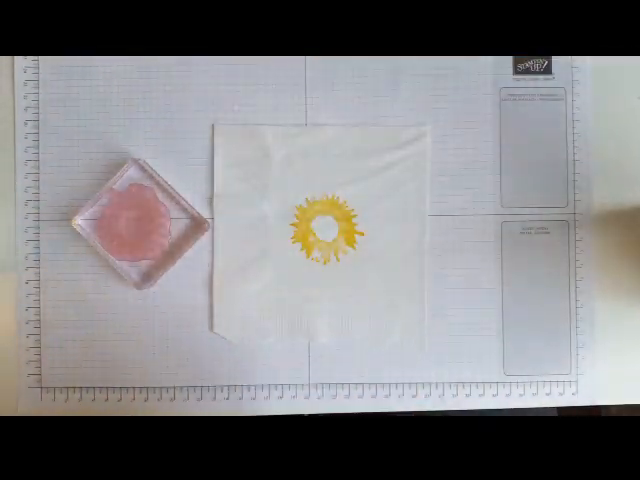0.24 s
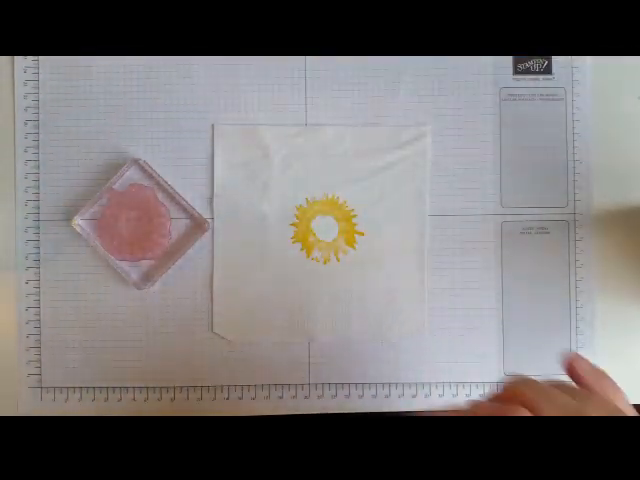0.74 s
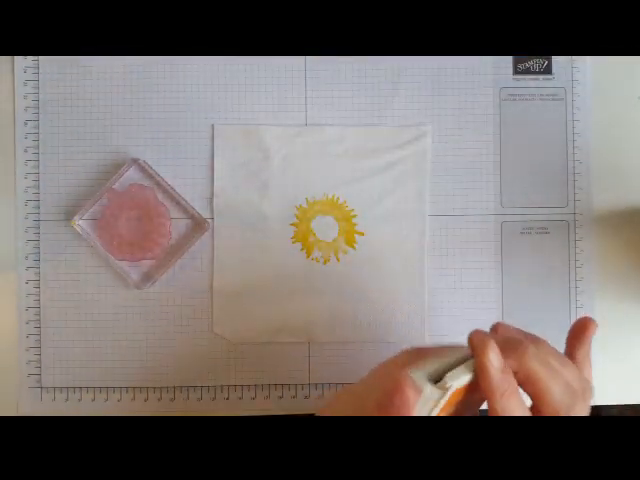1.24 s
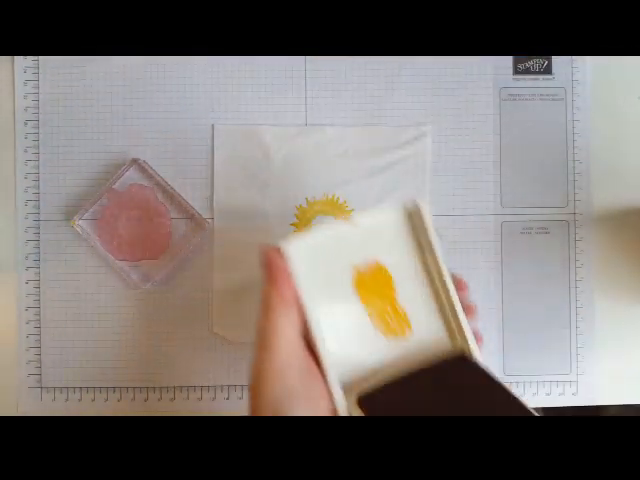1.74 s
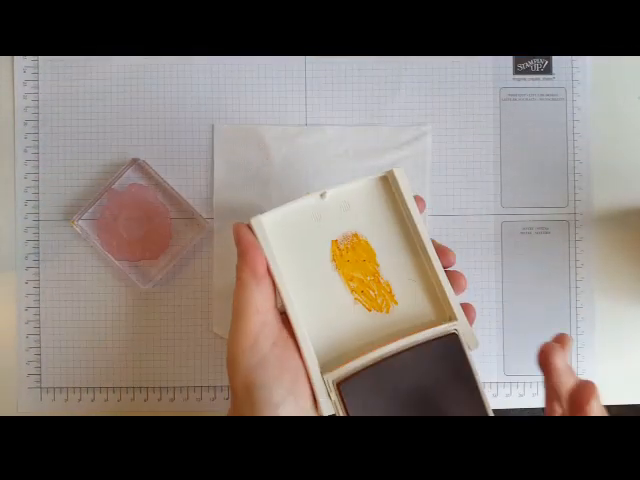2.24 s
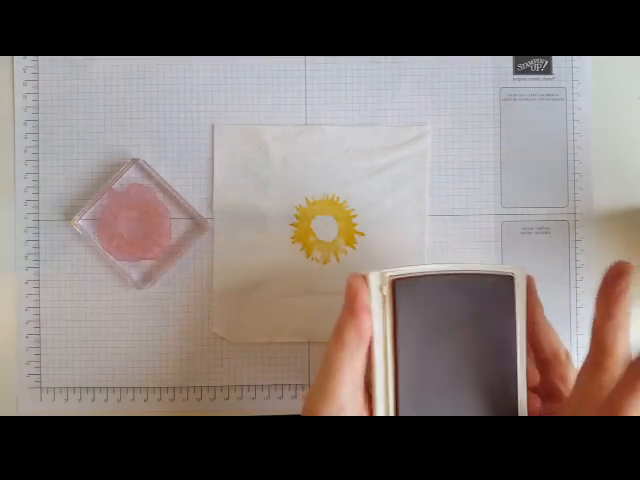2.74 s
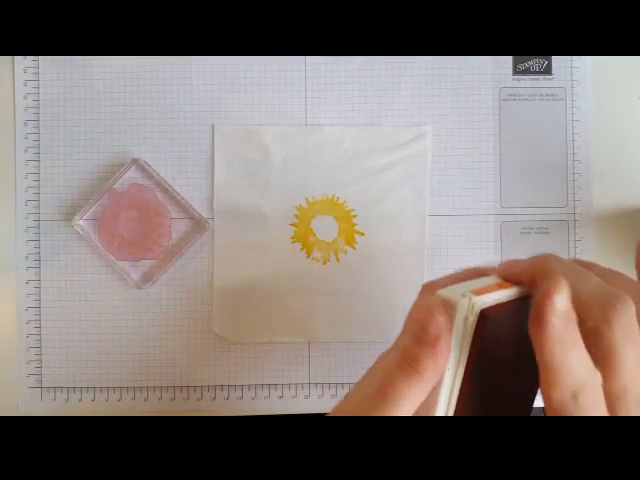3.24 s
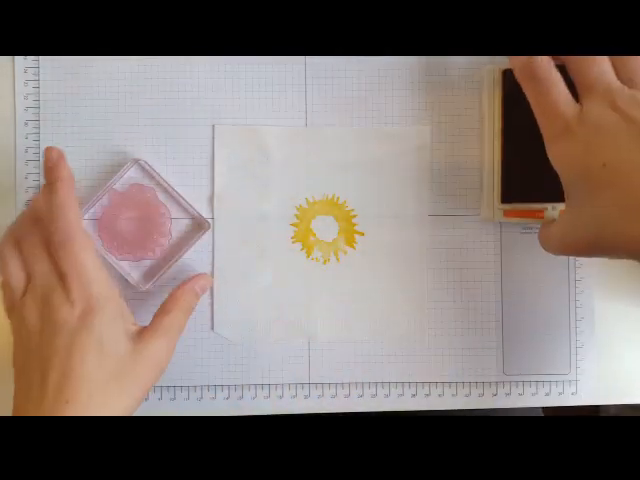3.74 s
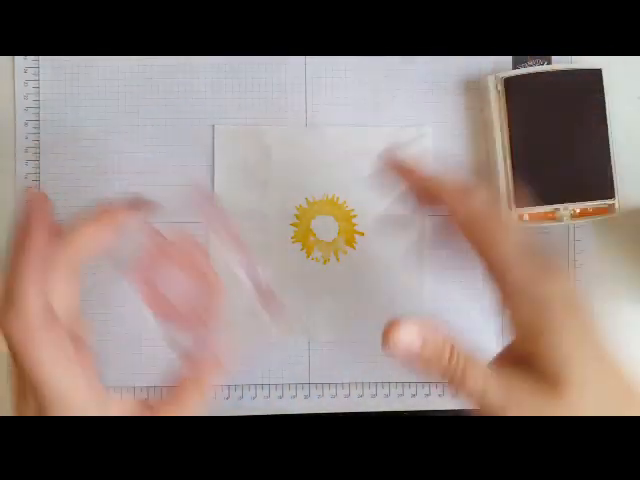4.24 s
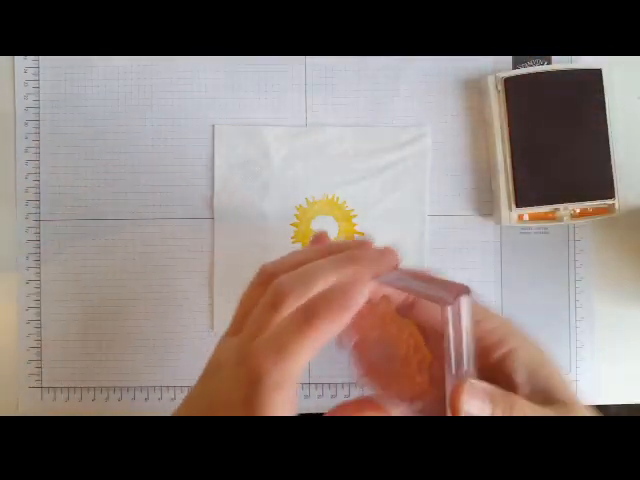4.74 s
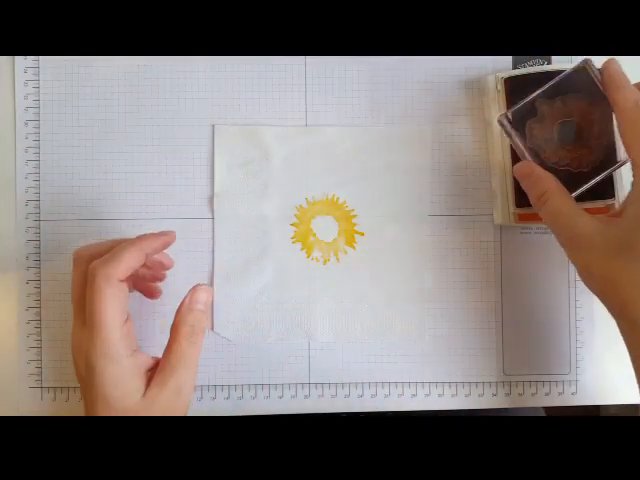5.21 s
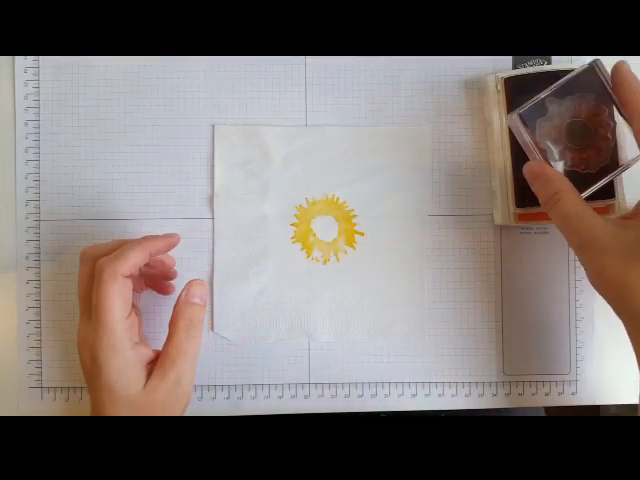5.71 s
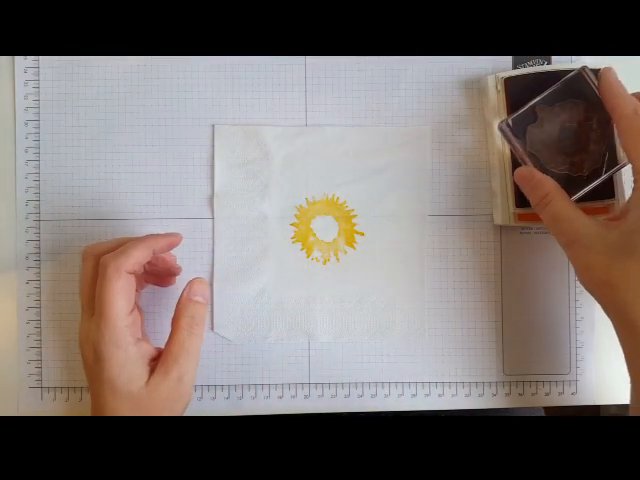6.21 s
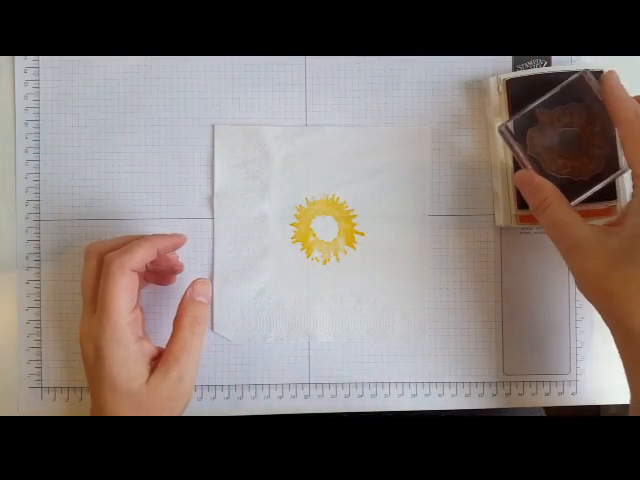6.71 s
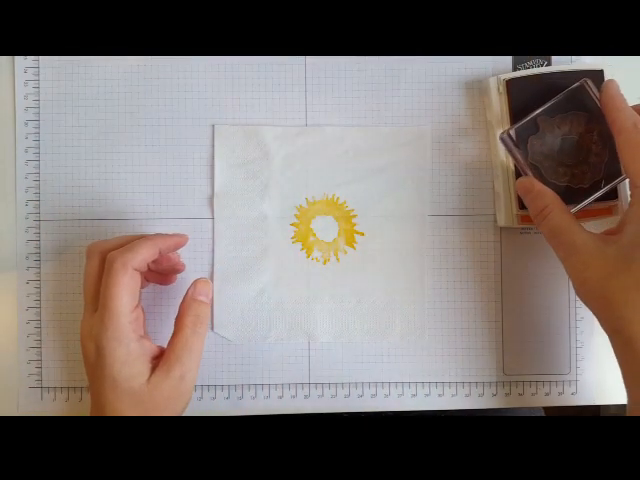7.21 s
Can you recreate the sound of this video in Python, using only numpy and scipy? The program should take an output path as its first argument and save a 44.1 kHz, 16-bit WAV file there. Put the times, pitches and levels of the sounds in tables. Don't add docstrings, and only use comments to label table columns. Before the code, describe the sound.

Close plastic clicks and clacks, a short scraping slide and latch snap, two firm knocks on the desk, then quiet padded taps with faint sticky peels.

```python
import sys
import numpy as np
from scipy import signal
from scipy.fft import rfft, irfft
from scipy.io import wavfile
from scipy.ndimage import uniform_filter1d

SR = 44100
rng = np.random.default_rng(int(sys.argv[2]) if len(sys.argv) > 2 else 0)


def master_out(mix):
    frames = np.transpose(np.atleast_2d(mix))
    ceiling = np.clip(frames, -1, 1)
    pcm = np.round(ceiling * 32767).astype(np.int16)
    wavfile.write(sys.argv[1], SR, pcm)


def to_linear_factor(level_db):
    exponent = np.asarray(level_db, float) / 20
    return 10 ** exponent


N = 329338
T = np.arange(N) / SR

# start in seconds, middle modes in dB, low modes in dB re middle,
# brightness in dB re middle, contact time in ms.
OPENING_BLOWS = [(0.872, -42.5, 3.5, -7.5, 7.5), (0.894, -40, 0.5, 5.5, 3.54),
                 (0.986, -51, 11.5, -6.5, 3.9), (1.003, -42.5, -0.5, -5.5, 2.2),
                 (1.063, -36.5, 5.5, 6.5, 4.45), (1.119, -32.5, -11, -13, 5.2),
                 (1.164, -49, 4.5, -28.5, 2.1), (1.188, -37.5, -10.5, -20, 1.9), (1.323, -54, -5, -8.5, 4),
                 (1.378, -25.5, -0.5, 4.5, 4), (1.386, -49, -3, -0.5, 4.3), (1.479, -47.5, -11, -15, 5.3),
                 (1.557, -40, -8, -9, 11), (1.575, -30.5, -7.5, -10, 2.45), (1.599, -35, -7.5, -9, 2.1),
                 (1.71, -49, -22, -15, 3.8)]
FLIP_BLOWS = [
    (1.7595, -35.5, 11.5, -2, 2.8),
    (1.8355, -25, 0, -10.5, 3),
    (1.867, -32, 8, -7.5, 2.9),
    (1.8795, -18, -3, -5, 3),
    (1.89, -33.5, 0, -6, 4),
    (1.921, -27.5, 9.5, -0.5, 5.1),
    (1.960, -34.5, -4.5, 8, 3.6),
    (1.9685, -26.5, 7, 2, 3.6),
    (2.007, -33.5, -3, -6.5, 2.8),
    (2.105, -52, -3.5, -5, 2),
]
LATCH_BLOWS = [(2.331, -53.5, -8.5, -21.5, 5.1), (2.344, -51.5, -8.5, -17, 4.9), (2.406, -44, 0, 0, 2.5),
               (2.4525, -37, 3, 5, 2.1), (2.4845, -34, 3.5, 10, 1.7), (2.492, -40, 4, 4.5, 1.8),
               (2.519, -45, -9, 1, 1.5), (2.579, -41, -8, 9, 2.7), (2.634, -18, -7.5, 5, 3.2),
               (2.644, -31.5, 1.5, 2.5, 2.5), (2.7665, -26.5, 1, -6, 2.1), (2.7695, -16.5, 0.5, 3.5, 5.2),
               (3.031, -48.5, -30.5, -8.5, 3.2), (3.054, -54, -26, -15, 1.7)]
NAIL_TICKS = [
    (2.978, -71.5, -6.5, 9.5, 1.7),
    (2.9995, -55, -16, 4, 1.25),
]
SET_DOWN_BLOWS = [
    (3.8635, -19.5, -4, -6, 1.6),
    (3.874, -23, -11, -18.5, 0.54),
    (3.970, -17, -3, 3.5, 3),
    (3.979, -20, -4.5, 2.5, 1.4),
    (4.509, -61, -23, -17, 3.9),
]
TAP_BLOWS = [
    (5.411, -56.5, 34.8, -6.5, 6.1),
    (5.975, -43, 23.75, -24, 9.6),
    (6.35, -62.5, 30.8, -14, 4.5),
    (6.514, -45.5, 29.3, -6.5, 5.1),
    (6.918, -51.5, 37.6, 6.5, 7),
    (7.176, -43.5, 26.5, -5.5, 8.4),
]
LIFT_TICKS = [
    (5.694, -55, 5, -31, 6.3),
    (6.179, -61, -15, -16, 2.4),
    (6.773, -64.5, 34.5, -10, 12.5),
    (7.078, -49, 6.5, -30, 16.5),
    (7.108, -72, -13.5, -24.5, 1.7),
    (7.307, -56, -1, -33, 4.4),
]
DESK_BLOWS = [
    (0.306, -56, -3, -8, 33),
    (0.3325, -27.5, 1, 1, 5.1),
    (0.340, -35, 1, -7, 2.5),
    (0.347, -28, 7.5, -4, 4.7),
    (0.362, -36.5, 1, -9, 12),
]

# frequency in Hz, width in Hz, peak height in dB.
SHUT_CASE_MODES = [(386, 47, 7.5), (500, 123, 3.5), (774, 37, 2), (1200, 300, -1), (1764, 100, -28),
                   (2380, 410, -18.5), (2820, 2600, 0.5)]
LID_POP_MODES = [(374, 41, 0), (1025, 48, -5), (1180, 38, -6.5), (1690, 25, -6), (2412, 36, -6.5),
                 (2980, 76, -9.5), (3590, 30, -7), (3930, 19, -17), (4870, 25, -19)]
LOOSE_LID_MODES = [(496.7, 22, -5.5), (770, 32, -12.5), (1150, 130, -1.5), (1580, 17, -16), (1827, 26, -12),
                   (2170, 69, -4.5), (2690, 32, -9.5), (3340, 27, -29), (3770, 45, -26)]
RAIL_MODES = [(290, 65, -5), (379, 26, 6), (510, 63, 9), (740, 100, -11), (1080, 60, 4.5), (1970, 110, 5.5),
              (2270, 390, 0.5), (2500, 57, 1), (2900, 360, -8.5), (3642, 210, -2), (8560, 860, 2.5)]
LID_STOP_MODES = [(511, 83, -7), (1050, 200, 2), (1790, 270, -1.5), (2680, 170, -2.5), (3454, 89, -12.5),
                  (3960, 230, -14.5), (4540, 100, -12)]
LATCH_MODES = [(377, 30, -2), (641, 60, -9.5), (1054, 83, 0), (1200, 100, -5.5), (1640, 60, -9),
               (2024, 79, -2), (2190, 65, -4), (2480, 51, -4), (3400, 60, -14), (3630, 60, -2),
               (4970, 80, -21)]
CASE_EDGE_MODES = [(280, 39, 2), (376, 40, -13.5), (660, 60, -1.5), (757, 32, 6), (1150, 75, -6),
                   (1580, 130, 2.5), (1950, 100, -10.5), (2300, 200, -8.5), (2650, 150, -17.5)]
CASE_ON_DESK_MODES = [(137, 10, 1), (289, 6.5, 8), (388, 34, 3), (495, 21, 12), (740, 34, 7),
                      (1140, 120, 3), (1646, 104, -4.5), (2125, 130, -1.5), (2780, 170, -4),
                      (3880, 500, -5), (5000, 530, -8)]
PAD_MODES = [(44.7, 5.9, 1), (73.8, 6.6, 1.5), (131, 4.6, 5), (210.4, 1.8, -18), (293.7, 22.2, 1.5),
             (328, 34, -27), (408, 6.8, -5.5), (785, 54, -1.5), (1100, 87, -0.5), (1550, 90, 1.5),
             (1860, 430, -2)]
DESK_MODES = [(193, 25, -7), (280, 15.5, -3), (530, 68, -2), (761, 63, -4), (1184, 55, -7.5),
              (1530, 40, -12), (1890, 68, -8), (2380, 120, -24), (2800, 40, -26), (3350, 50, -25),
              (4830, 200, -7)]

# frequency in Hz, width in Hz, peak height in dB.
SLIDE_MODES = [(440, 53, -5), (600, 49, -9), (1140, 88, 3), (1480, 260, -5), (1890, 94, 1), (2100, 180, -1),
               (2250, 160, 3), (2560, 220, -4.5), (3000, 200, -6), (3550, 350, -10.5)]
PEEL_MODES = [(504, 32, 11), (750, 160, -5), (1080, 140, -27), (1520, 220, -6.5), (2124, 170, -4),
              (2600, 200, -9.5), (4300, 2300, -23)]
# peak in seconds, level in dB, rise in seconds, fall in seconds (30 dB each),
# hiss in dB re level.
SLIDE_STROKES = [
    (1.13, -69, .008, 0.28, 4),
    (1.26, -56.5, 0.052, 0.08, -3),
    (1.558, -45.5, 0.005, 0.061, -11),
    (1.775, -55.5, 0.23, .05, -12),
    (2.435, -53, 0.2, .2, -8.5),
    (2.51, -52.5, .05, .2, -9.5),
    (2.55, -51, 0.14, .16, -7.5),
    (2.61, -59.5, 0.091, .06, -17),
    (3.378, -53, 0.035, 0.054, -3),
]
PEEL_STROKES = [
    (5.715, -59, 0.043, 0.086, -27),
    (6.32, -64, 0.08, 0.044, -22),
    (6.78, -51, 0.044, 0.051, -20),
    (7.1, -67, 0.1, 0.037, -22.5),
    (7.345, -65, 0.14, 0.087, -12.5),
]
# peak in seconds, level in dB, rise in seconds, fall in seconds,
# favoured frequency in Hz.
SLIDE_CATCHES = [(1.255, -51.5, 0.026, 0.033, 2173), (1.263, -48, 0.047, 0.047, 600),
                 (1.612, -50, 0.034, 0.016, 2400), (1.62, -58.5, .05, 0.11, 1220),
                 (1.715, -55, .06, 0.052, 1200), (2.41, -52, 0.0097, 0.031, 480),
                 (2.415, -49, 0.027, 0.17, 1150), (2.435, -49.5, 0.033, 0.049, 3000),
                 (2.46, -40.5, .02, 0.0088, 2500), (2.494, -32, 0.022, 0.0099, 2400),
                 (2.5, -46, 0.028, 0.085, 450), (2.525, -44, 0.026, 0.072, 2500),
                 (2.536, -49.5, .05, 0.028, 1150), (2.57, -49, 0.054, 0.057, 1400),
                 (2.582, -45, 0.028, 0.14, 3000), (2.594, -37.5, 0.054, 0.017, 1600),
                 (2.585, -50.5, .03, 0.062, 500)]
PEEL_CATCHES = [(5.699, -63, 0.019, 0.067, 750), (5.719, -48.5, 0.033, 0.039, 1080),
                (5.718, -76, 0.027, 0.022, 2500), (6.304, -59.5, 0.046, 0.054, 1080),
                (6.323, -54, 0.05, 0.032, 1080), (6.78, -48.5, 0.031, 0.041, 1080),
                (6.787, -53, 0.031, 0.021, 2440), (6.779, -59.5, 0.033, 0.024, 4300),
                (7.0, -73, .1, 0.19, 2700), (7.085, -53, 0.042, 0.053, 898), (7.108, -58, .05, 0.023, 2300),
                (7.112, -61, 0.018, 0.036, 860), (7.31, -66, 0.073, 0.062, 1030),
                (7.345, -57, 0.046, .07, 2370), (7.345, -37, 0.066, 0.03, 1240)]
# start in seconds, peak in dB, frequency in Hz.
RAIL_BUMPS = [(2.433, -45, 3400), (2.495, -39, 2300), (2.498, -34, 466), (2.518, -36, 2300),
              (2.533, -39, 1190), (2.548, -40, 1200), (2.557, -39, 1750), (2.566, -38.5, 1150),
              (2.575, -38.5, 1750), (2.579, -37, 2900), (2.587, -36.5, 1700), (2.596, -38, 1550),
              (2.608, -41, 1200), (2.611, -40, 2800)]

# frequency in Hz, level in dB, decay in dB/s, beat rate in Hz, beat depth 0-1.
METAL_MODES = [
    (1847, -56, 14, 10.4, .5),
    (1450, -64, 20, 5.5, .3),
    (770, -64, 35, 7, .3),
]
# peak in seconds, level in dB, fall in seconds.
NUDGES = [(0.08, -54, 0.57), (.6, -67, 0.13), (1.64, -52.5, 2), (2.16, -54, 0.095), (2.55, -50.5, 0.053),
          (2.89, -43, 0.33), (3.43, -47, 0.22), (4.33, -54, 1.8), (4.61, -51, 0.14), (5.1, -63, 0.69),
          (5.57, -54.5, 0.33), (5.88, -50.5, 0.41), (6.14, -55, 0.054), (6.37, -54, 0.099),
          (6.62, -56.5, 0.52), (7.065, -41, 0.37), (7.3, -50, 0.49), (7.43, -48.5, .3)]
# peak in seconds, level in dB, fall in seconds.
JOLTS = [(1.12, -49, 0.21), (1.97, -67, 0.093), (2.64, -45.5, 0.17), (3.02, -44, 0.36),
         (3.872, -39.5, 0.096), (3.985, -28.5, 0.078), (5.42, -58, 0.14), (5.99, -50, 0.16),
         (6.525, -32.5, 0.036), (6.925, -41, 0.088), (7.19, -36.5, 0.15)]
# peak in seconds, level in dB, rise in seconds,
# fall in seconds, frequency in Hz.
CREAKS = [(.61, -56, 0.053, 0.096, 254), (2.93, -55.5, 0.21, 0.35, 218), (2.95, -52.5, .2, 0.68, 156.7),
          (2.99, -56.5, 0.17, 0.17, 289.6), (3.09, -61, .12, 0.26, 280), (3.3, -57.5, 0.1, 0.09, 207),
          (7.021, -57.5, 0.11, 0.33, 205), (7.35, -57, .25, 0.14, 289)]

# left minus right in dB, left lag in ms, room send in dB.
PLACES = [
    (3, 0.19, 1.5),
    (1, 0.017, -6.5),
    (-0.5, -0.03, -9.5),
    (0.5, 0.025, -8.5),
    (0, -0.032, -6),
    (2, 0.091, -9.5),
]
# band centre in Hz, 60 dB decay time in seconds, level in dB.
ROOM_BANDS = [(151, 0.72, 8.5), (364, 0.35, 10.5), (920, 0.36, 9), (2460, 0.32, 12), (6340, 0.32, 12.5),
              (11500, 0.58, -17)]
# frequency in Hz, level in dB.
AIR_SPECTRUM = [(20, -50.5), (40, -12), (82, -13.5), (123, -5.5), (141, -10), (160, -20.5), (230, -27),
                (460, -32.5), (700, -31.5), (1150, -37), (2000, -38), (7000, -44), (14400, -45.5),
                (15300, -61.5)]
# frequency in Hz, correlation 0-1.
AIR_LIKENESS = [(60, 1), (300, 0.7), (800, 0.1), (3000, 0), (12000, 0)]
# time in seconds, gain in dB.
STIR = [(0, 3.5), (.5, 12.5), (.8, 11.5), (1.3, 8.5), (1.8, 11.5), (2.2, 6.5), (2.7, 0), (2.9, 20),
        (3.2, 9.5), (3.6, 7.5), (4.45, 7), (4.65, 5.5), (5.35, 6), (5.8, 5.5), (6.4, 4.5), (6.9, 7),
        (7.1, 13), (7.47, 11)]
# centre in seconds, dB over the resting hiss, half length in seconds.
SLEEVES = [
    (0, 8, 0.082),
    (0.826, 11, 0.35),
    (1.797, 7.5, 0.4),
    (2.845, 5, 0.41),
    (3.603, 7, .17),
    (4.299, 2, 0.34),
    (5.194, 6, 0.13),
]
THINNED_HZ = [10300, 11200, 12200, 13300, 14500, 17000]


def case_opening():
    shut = OPENING_BLOWS[:9] + OPENING_BLOWS[11:]
    shell = knocks(shut, SHUT_CASE_MODES, dense_db=-10.0, crack_re_db=-2, top_db=-8.5, clean=0.27)
    pop = knocks(OPENING_BLOWS[9:11], LID_POP_MODES, dense_db=-14, crack_re_db=-11, top_db=-15.0, clean=0.33)
    return shell + pop


def lid_flip():
    return knocks(FLIP_BLOWS, LOOSE_LID_MODES, dense_db=-16.5, crack_re_db=-11.0, top_db=-15.0, clean=0.17)


def slide_and_latch():
    rails = knocks(LATCH_BLOWS[:8], RAIL_MODES, dense_db=-9.5, crack_re_db=-14.5, top_db=-8, clean=0.26)
    stop = knocks(LATCH_BLOWS[8:10], LID_STOP_MODES, dense_db=-12, crack_re_db=-4, top_db=-10.5, clean=0.27)
    latch = knocks(LATCH_BLOWS[10:], LATCH_MODES, dense_db=-15, crack_re_db=-5.5, top_db=-12, clean=0.15)
    scrape = rubbing(SLIDE_STROKES, SLIDE_CATCHES, SLIDE_MODES, rate=1100, spread_db=1.5, smooth=.45)
    nails = knocks(NAIL_TICKS, RAIL_MODES, dense_db=3, crack_re_db=3.5, top_db=-2.5, clean=0.6)
    return rails + stop + latch + scrape + nails


def setting_down():
    edge = knocks(SET_DOWN_BLOWS[:2], CASE_EDGE_MODES, dense_db=-14.5, crack_re_db=-11.0, top_db=-25, clean=0.044)
    flat = knocks(SET_DOWN_BLOWS[2:], CASE_ON_DESK_MODES, dense_db=-11.5, crack_re_db=-9.5, top_db=-15.5,
                  clean=0.07)
    return edge + flat


def stamping():
    rebound_s, rebound_db, rebound_low_db, bright_db, contact_ms = .024, -12, 33, -10, 6
    rebounds = [(s + rebound_s, db + low_db - rebound_low_db + rebound_db, rebound_low_db, bright_db, contact_ms)
                for s, db, low_db, _, _ in TAP_BLOWS]
    blows = TAP_BLOWS + rebounds + LIFT_TICKS
    taps = knocks(blows, PAD_MODES, dense_db=-34.0, crack_re_db=-8.0, top_db=-3.0, clean=0.39)
    return taps + rubbing(PEEL_STROKES, PEEL_CATCHES, PEEL_MODES, rate=1300, spread_db=3.0, smooth=0.89)


def desk_knock():
    return knocks(DESK_BLOWS, DESK_MODES, dense_db=-14.5, crack_re_db=-9.5, top_db=-3.5, clean=0.23)


def knocks(events, modes, dense_db, crack_re_db, top_db, clean):
    size = 16384
    scatter_db, detune = 1.5, .015
    snap_hz, snap_share = 3674, 1
    out = np.zeros((2, N + size))
    lowest = modes[0][0]
    registers = np.log([.4 * lowest, .8 * lowest, 450, 1150, 2600, 6000, 12500, 16500])
    t = np.arange(size) / SR
    f = np.maximum(np.arange(size // 2 + 1) * SR / size, 1)
    snap = 1 / (1 + (snap_hz / f) ** 4)
    hz, width, mode_db = np.transpose(modes)[:, :, None]
    for s, db, low_db, upper_db, ms in events:
        crack_db = 1.2 * upper_db + crack_re_db
        noise = rng.standard_normal(size)
        chance = rng.standard_normal((2, len(modes), 1))
        reach = t * 1000 / max(ms, .2)
        push = noise * np.exp(-reach) * np.minimum(reach / 0.43, 1)
        push[0] = clean * np.sqrt(np.sum(push ** 2))

        height = to_linear_factor(mode_db + scatter_db * chance[0]) ** 2
        peaks = height / (1 + (2 * (f - hz * (1 + detune * chance[1])) / width) ** 2)
        power = peaks.sum(0) + to_linear_factor(dense_db) ** 2
        colour = [low_db - 16.5, low_db, low_db, 0, upper_db - 2.5,
                  crack_db - 10.5, crack_db + top_db, crack_db + top_db - 17.5]
        tilt = to_linear_factor(np.interp(np.log(f), registers, colour))
        response = causal(np.log(tilt * np.sqrt(power)), size=size)

        contact = (1 - snap) * rfft(push) + snap * rfft(push * np.exp(-reach / snap_share))
        contact *= causal(-np.log(uniform_filter1d(np.abs(contact) ** 2, size=30)) / 2, size=size)
        spread = uniform_filter1d(np.abs(response) ** 2, size=24)
        near = irfft(response * contact, size)
        far = irfft(causal(np.log(spread) / 2, size=size), size)
        near[size // 2:] = 0
        near *= to_linear_factor(db + 3.5) / np.abs(band(near, 750, 1650)).max()
        i = int(s * SR)
        out[:, i:i + size] += near, np.std(near) * unit(far)
    return out[:, :N]


def causal(log_gain, size):
    cepstrum = irfft(log_gain, size)
    cepstrum[1:size // 2] *= 2
    cepstrum[size // 2 + 1:] = 0
    return np.exp(rfft(cepstrum))


def rubbing(strokes, catches, modes, rate, spread_db, smooth):
    patch_db, catch_octaves = 4, 0.14
    struck = rng.random(N) < rate / SR
    slips = struck * to_linear_factor(spread_db * np.minimum(rng.exponential(size=N), 2.5)) * rng.standard_normal(N)
    slips = unit(slips) + smooth * rng.standard_normal(N)
    slips /= np.sqrt(uniform_filter1d(slips ** 2, size=1400))
    patches = np.repeat(rng.standard_normal((len(modes), N // 700 + 1)), 700, axis=1)[:, :N]
    drive = slips * to_linear_factor(patch_db * uniform_filter1d(patches, size=500))
    voices = band(signal.oaconvolve(drive, ringing(modes, size=1024), axes=1)[:, :N], 300, 5500)
    body = unit(voices.sum(0))
    hiss = unit(band(slips + rng.standard_normal(N), 3200, 12000))

    octaves = np.log2(np.transpose(modes)[0][:, None] / np.transpose(catches)[-1])
    favour = np.exp(-(octaves / catch_octaves) ** 2) / voices.std(axis=1)[:, None]
    lift = favour @ np.array([swell(*row[:-1]) for row in catches])
    out = (lift * voices).sum(0)
    for s, db, rise_s, fall_s, hiss_db in strokes:
        out = out + swell(s, db, rise_s, fall_s) * (body + to_linear_factor(hiss_db) * hiss)
    return out


def ringing(modes, size):
    hz, width, db = np.transpose(modes)[:, :, None]
    t = np.arange(size) / SR
    height = to_linear_factor(db) * 2 * np.pi * width / SR
    return height * np.exp(-np.pi * width * t) * np.sin(2 * np.pi * hz * t)


def swell(s, db, rise_s, fall_s):
    out = np.zeros(N)
    near = slice(max(int((s - 2 * rise_s) * SR), 0), int((s + 2 * fall_s) * SR))
    t = T[near] - s
    out[near] = to_linear_factor(db - 30 * np.where(t < 0, -t / rise_s, t / fall_s))
    return out


def bumps():
    rise_ms, fall_ms = 1.5, 3.5
    out = np.zeros(N)
    t = np.arange(2048) / SR
    shape = (1 - np.exp(-t * 1000 / rise_ms)) * np.exp(-t * 1000 / fall_ms)
    shape /= shape.max()
    for (s, db, hz), turn in zip(RAIL_BUMPS, rng.random(len(RAIL_BUMPS))):
        i = int(s * SR)
        out[i:i + len(t)] += to_linear_factor(db) * shape * np.sin(2 * np.pi * (hz * t + turn))
    return out


def metal_ring():
    start_s, end_s, fade_s = .425, .86, .025
    damped_s, damped_db = .638, -12
    t = T - start_s
    held = np.clip(np.minimum(t + fade_s, end_s - T) / fade_s, 0, 1)
    held = held * to_linear_factor(damped_db * np.clip((T - damped_s) / 0.01, 0, 1))
    out = 0
    for hz, db, decay, beat_hz, depth in METAL_MODES:
        beat = np.abs(1 + depth * np.exp(2j * np.pi * beat_hz * t)) / (1 + depth)
        out = out + tone(held * to_linear_factor(db - decay * np.maximum(t, 0)) * beat, hz, .0015)
    return out


def desk_sway():
    nudge_rise_s, jolt_rise_s, sway_hz = 0.16, 0.017, 124.8
    shakes = [swell(s, db, nudge_rise_s, fall_s) ** 2 for s, db, fall_s in NUDGES]
    shakes += [swell(s, db, jolt_rise_s, fall_s) ** 2 for s, db, fall_s in JOLTS]
    creaks = sum(tone(swell(*row[:-1]), row[-1], 0.02) for row in CREAKS)
    return tone(np.sqrt(sum(shakes)), sway_hz, 0.0503) + creaks


def tone(level, hz, wander):
    drift = uniform_filter1d(rng.standard_normal(N), size=2000)
    drift = unit(uniform_filter1d(drift, size=2000))
    return np.sqrt(2) * level * np.sin(2 * np.pi * np.cumsum(hz * (1 + wander * drift)) / SR)


def place(x, pan_db, lag_ms):
    glance_db, glance_ms, glance_hz = -6, 2.5, 650
    shift = lag_ms * SR / 2000
    glance = rng.standard_normal(512) * np.exp(-np.arange(512) * 1000 / SR / glance_ms)
    glance *= to_linear_factor(glance_db) / np.sqrt(np.sum(glance ** 2))
    odd = band(signal.oaconvolve(x, glance)[:N], glance_hz, 9000)
    samples = np.arange(N)
    ports = [to_linear_factor(side * pan_db / 2) * np.interp(samples - side * shift, samples, x) + side * odd
             for side in (1, -1)]
    return np.array(ports)


def room(x):
    t = np.arange(SR) / SR
    tail = 0
    for hz, t60, db in ROOM_BANDS:
        mid, side = rng.standard_normal((2, SR))
        unlike = np.clip(hz / 600, 0, .95)
        noise = band(mid + unlike * side * np.array([[1], [-1]]), hz / 1.54, hz * 1.57)
        tail = tail + to_linear_factor(db - 60 * t / t60) * noise
    tail = signal.sosfilt(signal.butter(6, 9800, fs=SR, output="sos"), tail)
    tail *= np.clip((t - .003) / 0.003, 0, 1)
    return signal.fftconvolve(x[None], unit(tail) / np.sqrt(SR), axes=1)[:, :N]


def floor():
    air_db, bass_share, murmur_share, rustle_rest_db = -78, 0.73, 0.9, -1.5
    mid, side = (shaped(rng.standard_normal(N), AIR_SPECTRUM, to_linear_factor) for _ in range(2))
    mid = shaped(mid, AIR_LIKENESS, lambda c: np.sqrt(1 + np.clip(c, 0, 1)))
    side = shaped(side, AIR_LIKENESS, lambda c: np.sqrt(1 - np.clip(c, 0, 1)))
    air = mid + side * np.array([[1], [-1]])
    air *= to_linear_factor(air_db + 2) / np.std(band(air, 840, 4600))

    stir_db = np.interp(T, *np.transpose(STIR))
    bass, murmur = to_linear_factor(bass_share * stir_db), to_linear_factor(murmur_share * stir_db)
    sleeves_db = sum(db * np.clip(1 - np.abs(T - s) / half_s, 0, 1) for s, db, half_s in SLEEVES)
    rustle = to_linear_factor(rustle_rest_db + sleeves_db)
    low = signal.sosfiltfilt(signal.butter(3, 160, fs=SR, output="sos"), air)
    high = signal.sosfiltfilt(signal.butter(1, 2500, "high", fs=SR, output="sos"), air)
    return bass * low + murmur * (air - low - high) + rustle * high


def shaped(x, table, gain):
    hz, value = np.transpose(table)
    f = np.maximum(np.arange(N // 2 + 1) * SR / N, 1)
    return irfft(rfft(x) * gain(np.interp(np.log(f), np.log(hz), value)), N)


def band(x, lo_hz, hi_hz):
    edges = [lo_hz, min(hi_hz, .45 * SR)]
    return signal.sosfilt(signal.butter(2, edges, "band", fs=SR, output="sos"), x)


def unit(x):
    return x / np.sqrt(np.mean(x ** 2))


def scene():
    actions = [desk_knock(), case_opening(), lid_flip(), slide_and_latch(), setting_down(), stamping()]
    direct = sum(place(x[0], pan_db, lag_ms) for x, (pan_db, lag_ms, _) in zip(actions, PLACES))
    send = sum(to_linear_factor(send_db) * x[1] for x, (_, _, send_db) in zip(actions, PLACES))
    direct = direct + place(bumps(), *PLACES[3][:2])
    ring = metal_ring()
    sway = desk_sway() * to_linear_factor(np.array([[.8], [-.8]]))
    return direct + place(ring, 1, 0) + room(send + .12 * ring) + sway + floor()


def mean_power(x):
    return uniform_filter1d(np.mean(x ** 2, axis=0), size=700) + 1e-14


def thin_treble(x):
    limit_db, most_db, patch_db = 37, 25, 6
    middle = mean_power(band(x, 700, 4000))
    out = x
    for lo_hz, hi_hz in zip(THINNED_HZ, THINNED_HZ[1:]):
        top = signal.sosfiltfilt(signal.butter(4, [lo_hz, hi_hz], "band", fs=SR, output="sos"), x)
        whim = uniform_filter1d(np.repeat(rng.standard_normal(N // 1024 + 1), 1024)[:N], size=300)
        gap_db = 10 * np.log10(middle / mean_power(top)) - 6 + patch_db * whim
        out = out - top * (1 - to_linear_factor(-np.clip(3 * (gap_db - limit_db), 0, most_db)))
    return out


def band_limit(x):
    return signal.sosfilt(signal.butter(12, 15980, fs=SR, output="sos"), x)


def record(dry):
    mic = signal.butter(8, 15300, fs=SR, output="sos")
    mix = signal.sosfilt(mic, thin_treble(dry))
    return band_limit(mix)


dry = scene()
out = record(dry)
master_out(out)
```